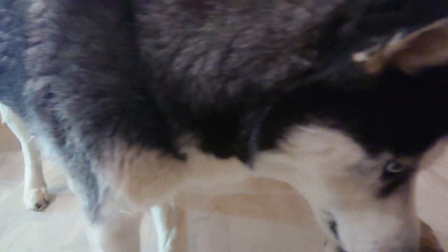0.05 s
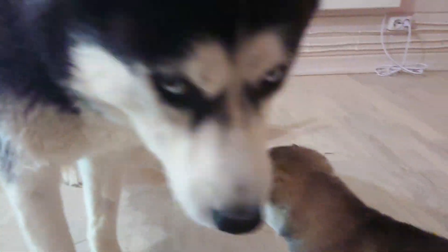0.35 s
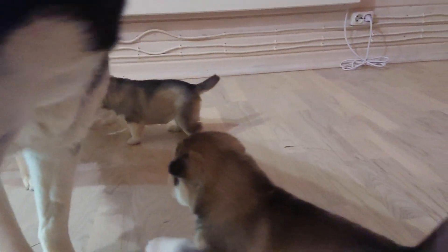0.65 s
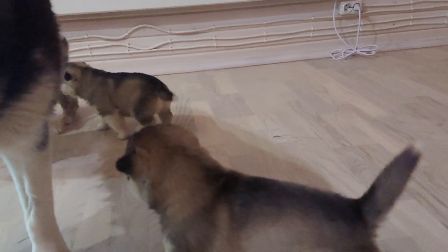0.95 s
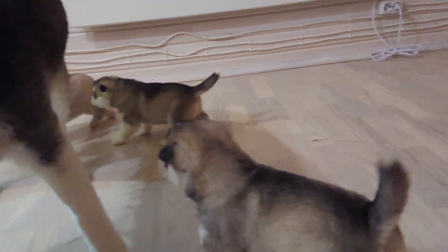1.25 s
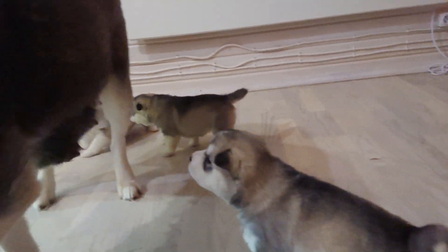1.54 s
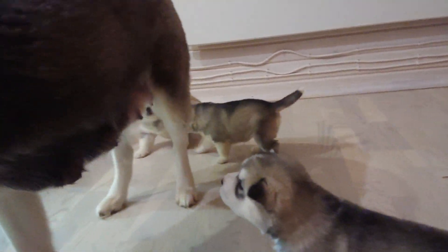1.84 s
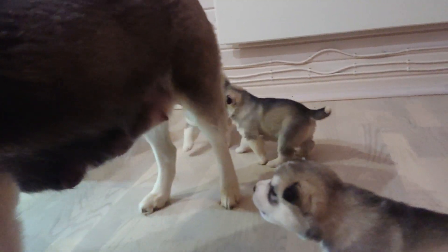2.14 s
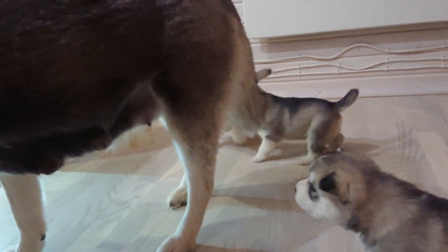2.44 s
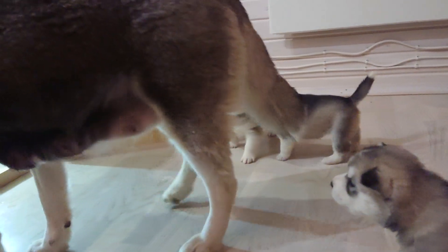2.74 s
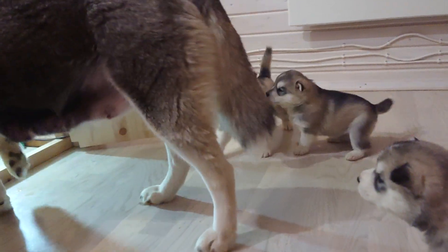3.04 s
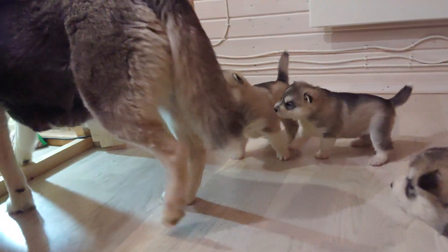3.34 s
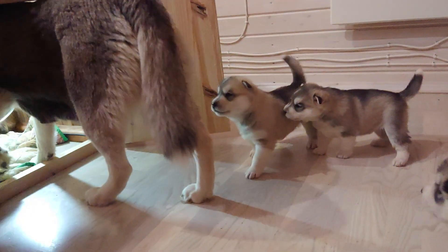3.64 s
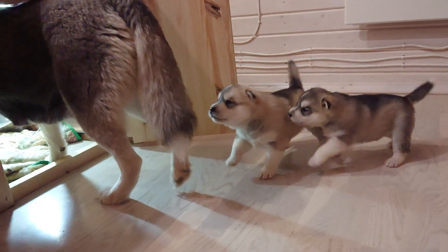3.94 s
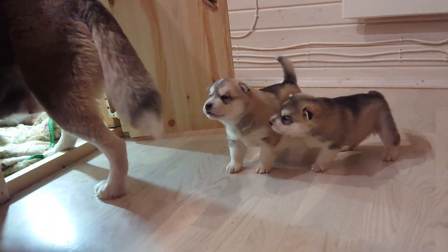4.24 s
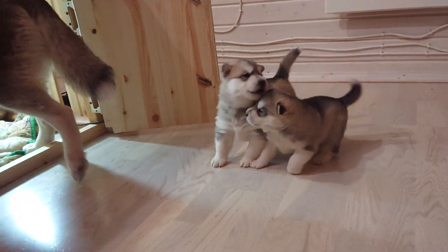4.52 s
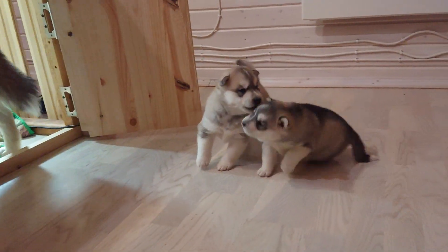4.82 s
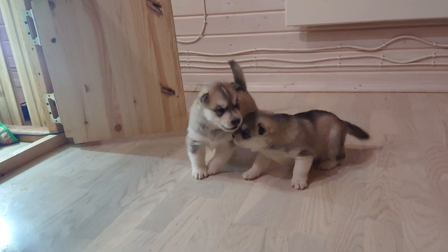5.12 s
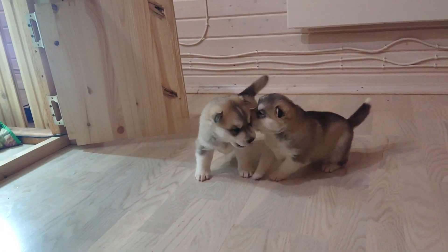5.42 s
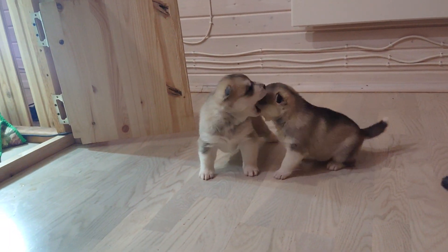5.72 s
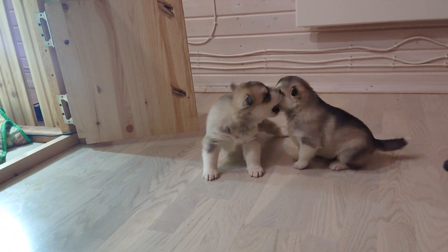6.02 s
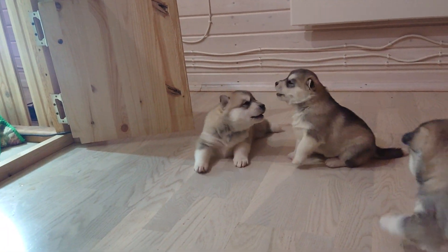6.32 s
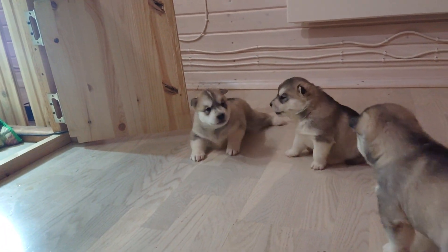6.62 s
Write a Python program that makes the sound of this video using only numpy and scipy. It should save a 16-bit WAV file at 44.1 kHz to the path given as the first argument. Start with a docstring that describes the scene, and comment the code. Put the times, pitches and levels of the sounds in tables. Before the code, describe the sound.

Two loud, high puppy yelps give way to soft, short squeaks, with paws padding and claws tapping on floorboards indoors.

```python
"""Paws skid, thud and click on a wooden floor, then a husky puppy yelps close by.
Small whimpers and hoarse grunts follow as the pups shuffle around their mother in a wood-panelled room.
Each cry is a high whistle of the vocal folds, shaped by a tiny throat and smeared by the bare walls.
Hard claws ring the boards and soft pads boom on them, over a faint hush and a thin hiss."""
import sys
import numpy as np
from scipy import signal
from scipy.fft import rfft, irfft, next_fast_len
from scipy.io import wavfile
from scipy.ndimage import uniform_filter1d, minimum_filter1d, map_coordinates

SR = 44100
rng = np.random.default_rng(int(sys.argv[2]) if len(sys.argv) > 2 else 0)


def to_wav(s):
    """Save 16-bit WAV."""
    ch = np.atleast_2d(s).T  # columns
    pcm = np.round(np.clip(ch, -1, 1) * 32767)  # PCM
    wavfile.write(sys.argv[1], SR, pcm.astype(np.int16))


N = 298557
TOP_HZ = 15900  # band limit

# paws sliding: start_s, length_s, level_db
SKID_CUES = [(0, 0.068, -49.5), (0.175, 0.032, -51.5), (1.494, .039, -56), (1.709, 0.1, -67),
             (1.962, .05, -60), (2.519, 0.063, -57.5), (3.017, 0.029, -57), (3.343, 0.0322, -60.5),
             (3.561, .13, -61.5), (3.948, .03, -55), (4.292, 0.12, -55), (6.073, 0.0694, -62),
             (6.53, .094, -59)]
# fur and pads rubbing on wood: frequency_hz, gain_db
SCUFF_EQ = [(240, -32.5), (400, -9.5), (636, -14.5), (730, -5.5), (1160, -16.5), (1380, -3), (2510, 1.5),
            (2840, -1.5), (3070, -2.5), (3580, -3), (5030, -3), (8900, -27), (10900, -13), (16000, -21)]
# how much the dogs stir: time_s, level_db
BUSTLE_CURVE = [(0.0, -63), (0.24, -68.5), (1.79, -64), (2.04, -72), (3.07, -70), (3.77, -76), (4.35, -64),
                (4.49, -70.5), (5.77, -75.5), (6.28, -71.5), (6.43, -71.5), (6.77, -69.5)]
# the floor under light steps: frequency_hz, gain_db
RUMBLE_EQ = [(21, -30), (35, -5.5), (65, 0.5), (146, -6.5), (225, -8.5), (444, -15), (559, -19), (900, -15),
             (1170, -45.5), (1980, -120)]
# the hush of the room: frequency_hz, gain_db
ROOM_TONE_EQ = [(21, -27), (35, -9.5), (88, 2), (443, -13), (778, 1), (1060, -8.5), (1300, -1.5),
                (1640, -14), (2340, -8), (3020, -18.5), (5050, -22), (8010, -31), (9100, -44.5),
                (10600, -24), (16000, -29.5)]
# heavier paw falls and bumps: start_s, level_db, knock_db, pitch_hz
PAW_CUES = [(0.101, -56.5, -6, 140), (0.856, -50, -4, 125), (0.949, -50, -11, 141.7),
            (1.124, -44.5, -11, 132), (1.38, -51.5, 1, 144), (1.499, -46.5, -16.5, 124),
            (1.949, -54, -10.5, 78.7), (2.969, -46.5, -17, 73.4), (4.335, -45, -11.5, 216),
            (4.537, -49, -6, 131), (4.606, -41.5, -18.5, 108), (4.764, -44.5, -34, 74.2),
            (5.0, -39, -11.5, 189), (5.39, -53, -6.5, 140), (5.812, -51, -28.5, 64.7),
            (5.991, -51, -33.5, 90.5), (6.283, -39, -21.5, 114.5), (6.309, -43, -43, 82.4),
            (6.548, -44, -10, 189.2)]
# low thud of the hollow floor: frequency_hz, gain_db
THUD_EQ = [(30, -16), (60, 5.5), (90, 0), (140, -5), (195, -3), (260, -17), (500, -32), (1500, -60.5)]
# woody midrange knock: frequency_hz, gain_db
KNOCK_EQ = [(100, -28), (220, -15), (300, 4), (390, 4.5), (520, -8.5), (650, -4), (850, -6), (1400, -10),
            (3000, -33)]
# claw taps: start_s, level_db, treble_db
CLAW_CUES = [(0.176, -41.5, -21), (0.198, -39.5, -20), (0.4308, -44.5, -16), (0.8561, -48.5, -10),
             (1.3834, -45.5, -7.5), (1.516, -39.5, -40), (1.7957, -36.5, -29), (2.1893, -31.5, -42),
             (2.1986, -31.5, -32.5), (2.961, -46, -26), (3.031, -39, -27.5), (3.042, -42, -24),
             (3.5301, -47.5, -25), (4.346, -32.5, -28), (4.9998, -41, -12), (5.1643, -48.5, -24),
             (5.475, -55.5, -8.5), (6.541, -46, -25)]
# resonances of a tapped floorboard: centre_hz, width_hz, gain_db
BOARD_MODES = [(1970, 130, 3), (1970, 160, 0.5), (2326, 83, 4), (2830, 170, -2.5), (3570, 600, -11),
               (5000, 480, -9.5)]
# loud cries: climax_s, level_db, swell_db_per_s, overtones_db, roughness (0-1)
YELP_CUES = [(0.301, -16.5, 95, -11.5, 0.07), (.603, -14.5, 84.5, -4.5, 0.46),
             (.657, -31.5, -170, 6.5, .22), (1.069, -29.5, -61, -17.5, 0.45)]
# one pitch line per loud cry, the third a second tone breaking out of the big yelp: time_s, pitch_hz
YELP_CONTOURS = [
    [(.236, 1710), (.297, 2441), (.318, 2697), (.375, 2736)],
    [(.522, 1802), (.545, 1533), (.555, 1348), (.576, 1359), (.593, 1507), (.618, 1740), (.665, 1549)],
    [(.606, 2235), (.622, 2320), (.64, 2526), (.666, 2323)],
    [(1.012, 2173), (1.056, 2361), (1.072, 2051), (1.088, 2186)],
]
# open-mouth voice colour: frequency_hz, gain_db
THROAT_EQ = [(900, -5.5), (1500, -1.5), (2200, -3.5), (2750, -1.5), (3600, -4), (4300, 0), (5000, 0),
             (5800, 3.5), (7000, -19), (9000, -23.5), (16000, -20)]
# hoarse falling grunts: start_s, pitch_hz, level_db
GRUNT_CUES = [(1.377, 1676, -49.5), (1.925, 1312, -57), (2.147, 1072, -63), (2.365, 1169, -63),
              (4.621, 1298, -54.5), (5.386, 1446, -56), (5.688, 1600, -53.5), (6.058, 1707, -46)]
# closed-mouth voice colour: frequency_hz, gain_db
NOSE_EQ = [(700, 12), (1300, -0.5), (1700, -2.5), (2050, 0), (2400, -14.5), (3300, -10.5), (4100, -12),
           (4800, 3), (5600, -9.5), (7000, -13), (16000, -24)]
# small arching cries: start_s, rise_s, fall_s, top_hz, level_db, overtones_db, roughness (0-1)
WHIMPER_CUES = [ (1.57, .033, 0.0175, 1850, -50, -30, 0.37), (2.108, 0.0424, 0.02, 1347, -45, -17, 0.1),
                (2.344, 0.0354, 0.025, 1470, -49.5, -17, 0.13), (2.776, .045, 0.033, 1674, -39, -12, 0.35),
                (3.073, 0.016, 0.033, 1333, -52, -32, 0.5), (3.4, 0.021, 0.024, 1215, -64.5, -19, 0.1),
                (3.877, .046, .022, 2380, -36.5, -31.5, .24), (4.139, .035, .037, 2101, -28.5, -24, .11),
                (4.395, 0.0298, 0.023, 1376, -49.5, -21, 0.65),
                (4.802, 0.031, 0.028, 1429, -45.5, -18.5, 0.31),
                (5.025, 0.034, 0.0148, 1880, -38.5, -13, .03), (5.58, .05, 0.028, 1806, -39, -23, 0.05),
                (5.947, .066, 0.047, 2396, -47, -21, 0.29), (6.291, .058, .097, 2287, -37.5, -22, 0.05),
                (6.71, .038, 0.056, 1704, -46, -24, 0.16), ]
# reverb time of the panelled room: frequency_hz, t60_s
WALL_DECAY = [(100, 0.08), (800, 0.3), (2200, 0.33), (5000, 0.28), (12000, 0.041)]
# microphone colour, notched in the treble: frequency_hz, gain_db
MIC_EQ = [(6000, 1.5), (7800, -8.5), (9000, -13), (10500, 6.5), (16000, -1.5)]
# thin, airy hiss: frequency_hz, gain_db
HISS_EQ = [(2000, -52), (7000, -9), (9000, -16), (10500, -1), (13000, -4.5), (16000, -3.5)]


def amp(db):
    """Decibels to gain."""
    return 10 ** (np.asarray(db) / 20)


def unit(x):
    """Scale to rms 1."""
    return x / np.sqrt(np.mean(x ** 2) + 1e-20)


def along(points, hz):
    """Read a curve of (frequency_hz, value) points on a log frequency axis."""
    f, v = np.transpose(points)
    return np.interp(np.log(hz + 1), np.log(f + 1), v)


def wobble(rate, size):
    """A smooth random curve, rate knots a second."""
    knots = rng.standard_normal(int(size * rate / SR) + 4)
    return map_coordinates(knots, [np.arange(size) * rate / SR])


def filtered(x, response):
    """Pass x through a frequency response."""
    n = x.shape[-1]
    padded = next_fast_len(n + 8192)
    return irfft(rfft(x, padded) * response(np.fft.rfftfreq(padded, 1 / SR)), padded)[..., :n]


def noise(spectrum, size):
    """Coloured noise of rms 1."""
    return unit(filtered(rng.standard_normal(size), lambda hz: amp(along(spectrum, hz))))


def diffuse(spectrum, wide_hz=600):
    """A stereo noise bed: narrow in the bass, wide in the treble."""
    side = filtered(noise(spectrum, N), lambda hz: np.clip(hz / wide_hz, .25, 1))
    mid = noise(spectrum, N)
    return unit(np.array([mid + side, mid - side]))


def pan(x, pan_db):
    """Tilt the stereo balance; negative leans right."""
    return x * amp([[pan_db / 2], [-pan_db / 2]])


def add(track, start_s, sound):
    """Mix a stereo sound in at its cue."""
    i = max(round(start_s * SR), 0)
    track[:, i:i + sound.shape[1]] += sound[:, :max(N - i, 0)]


def in_room(x, wet_db, pan_db, alike, lag_s=.00011):
    """Direct sound, lag_s later on the right, plus a wall reverb that differs for every spot."""
    size = SR // 2
    hz, t, spectra = signal.stft(rng.standard_normal((2, size)), SR, nperseg=256)
    decay = amp(-60 * t / along(WALL_DECAY, hz)[:, None])
    tail = signal.istft(spectra * decay, SR, nperseg=256)[1][:, :size]
    tail *= 1 - np.exp(-(np.arange(size) / SR / .00092) ** 2)  # the first echoes build up
    tail[0] = alike * tail[1] + np.sqrt(1 - alike ** 2) * tail[0]  # more alike, narrower image
    sound = signal.fftconvolve(x[None], tail, axes=1)
    sound *= amp(wet_db) * np.linalg.norm(x) / np.linalg.norm(sound, axis=1, keepdims=True)
    sound[:, :len(x)] += filtered(x, lambda f: np.exp(-2j * np.pi * f * [[0], [lag_s]]))
    return pan(sound, pan_db)


def paw_skids(grain_db=4, grain_hz=298.8):
    """A paw skids over the boards in a run of tiny catches."""
    out = np.zeros((2, N))
    for start_s, length_s, db in SKID_CUES:
        n = int(length_s * SR)
        rub = unit(noise(SCUFF_EQ, n) * amp(grain_db * wobble(grain_hz, n)))
        rub *= amp(db) * signal.windows.tukey(n, .5)
        add(out, start_s, in_room(rub, wet_db=1, pan_db=-3, alike=.3))
    return out


def shuffling(scuff_db=3.5, rumble_db=1, grain_db=1, lump_db=5):
    """The more the dogs stir, the more fur and pads rub and the floor rumbles under light steps."""
    bustle_db = np.interp(np.arange(N) / SR, *np.transpose(BUSTLE_CURVE))
    scuff = diffuse(SCUFF_EQ) * amp(bustle_db + scuff_db + grain_db * wobble(76, N))
    rumble = diffuse(RUMBLE_EQ) * amp(bustle_db + rumble_db + lump_db * wobble(36, N))
    return pan(scuff, pan_db=-2) + rumble


def room_tone(level_db=-67):
    """A faint, steady hush under everything."""
    return amp(level_db) * diffuse(ROOM_TONE_EQ)


def paw_thuds(boom_t60_s=.13, thud_t60_s=.18, knock_t60_s=.29, attack_s=.0044):
    """Soft pads and tumbling bodies thud on the hollow floor; each spot booms at its own pitch."""
    out, t = np.zeros((2, N)), np.arange(SR // 3) / SR
    for start_s, db, knock_db, hz in PAW_CUES:
        boom = np.sin(2 * np.pi * hz * t) * amp(-60 * t / boom_t60_s)
        thud = noise(THUD_EQ, len(t)) * amp(-7 - 60 * t / thud_t60_s)
        knock = noise(KNOCK_EQ, len(t)) * amp(knock_db - 2 - 60 * t / knock_t60_s)
        step = (boom + thud) * (1 - np.exp(-t / attack_s)) + knock
        add(out, start_s, in_room(amp(db) * step, wet_db=-9.5, pan_db=0, alike=.75))
    return out


def board_response(f):
    """A floorboard's resonances, summed in alternating polarity."""
    return sum((-1) ** k * amp(db) * 1j * f * width / (centre ** 2 - f ** 2 + 1j * f * width)
               for k, (centre, width, db) in enumerate(BOARD_MODES))


def claw_taps(ring_db=-1, tick_db=4, snap_db=17, ring_t60_s=.024, snap_t60_s=.002, scratch_t60_s=.032):
    """A hard claw tip gives a snap, a brief scratch and a short ring of the board."""
    out, t = np.zeros((2, N)), np.arange(SR // 12) / SR
    snap = amp(snap_db - 60 * t / snap_t60_s)
    scratch = amp(-60 * t / scratch_t60_s)
    for start_s, db, treble_db in CLAW_CUES:
        ring = unit(filtered(rng.standard_normal(len(t)), board_response))
        ring *= amp(db + ring_db - 60 * t / ring_t60_s)
        tick = noise([(800, -22), (3000, -1), (5000, 12), (8000, -9.5), (15000, -1.5)], len(t))
        tick *= amp(db + treble_db + tick_db) * (snap + scratch)
        add(out, start_s, in_room(ring, wet_db=3, pan_db=-4, alike=.32))
        add(out, start_s, in_room(tick, wet_db=-7, pan_db=-4, alike=.22))
    return out


def voice(pitch, db, overtones_db, rough, tract, jitter, slope_db, rasp_db=-6, growl_db=-13, air_db=-30):
    """Vocal folds sing through the tract; roughness adds jitter, breath and period doubling."""
    def tract_gain(k):
        return amp(along(tract, k * hz)) * (k * hz < TOP_HZ)

    n = len(pitch)
    hz = pitch * (1 + jitter * rough * wobble(900, n) + .008 * wobble(160, n))
    phase = 2 * np.pi * np.cumsum(hz) / SR
    overtones = sum(amp(slope_db * (k - 2.5)) * tract_gain(k)
                    * np.sin(k * phase + rng.uniform(0, 2 * np.pi)) for k in range(2, 6))
    # period doubling puts a growl halfway between the harmonics
    growl = sum(amp(slope_db * (k - 4.5)) * tract_gain(k + .5) * np.sin((k + .5) * phase)
                for k in range(1, 5))
    puffs = noise(tract, n) * (1 + np.cos(phase))  # air rushes through the folds once a cycle
    air = filtered(puffs, lambda f: 1 - 1 / (1 + (f / 1400) ** 8))
    harsh = rough * (amp(rasp_db) * air + amp(growl_db) * growl * wobble(200, n))
    fundamental = tract_gain(1) * np.sin(phase)
    tone = fundamental + amp(overtones_db) * (overtones + harsh) + amp(air_db) * rough * air
    shimmer_db = 3 * rough * wobble(200, n)
    return amp(db + shimmer_db) * tone * signal.windows.tukey(n, min(SR / 125 / n, 1))


def yelps(gain_db=-1, onset_s=.018, shut_db=-28, opening_s=.011, slump_db=-25.5, slump_s=.035,
          calm_share=.55, low_cut_hz=1345):
    """The nearest puppy cries out: each cry is roughest at its climax and then slumps."""
    out = np.zeros((2, N))
    for contour, (climax_s, db, swell_db_per_s, overtones_db, rough) in zip(YELP_CONTOURS, YELP_CUES):
        times, hz = np.transpose(contour)
        t = np.arange(times[0], times[-1], 1 / SR)
        age = t - times[0]
        nearness = np.exp(-np.abs(t - climax_s) / slump_s)
        push_db = np.where(t < climax_s, swell_db_per_s * (t - climax_s), slump_db * (1 - nearness))
        mouth_db = shut_db * np.exp(-age / opening_s)  # the opening mouth lets the overtones out
        strain = rough * (calm_share + (1 - calm_share) * nearness)
        cry = voice(np.interp(t, times, hz), db + gain_db + push_db, overtones_db + mouth_db, strain,
                    THROAT_EQ, jitter=.08, slope_db=-5, rasp_db=-5)
        cry *= np.minimum(age / onset_s, 1) ** 1.1
        # a tiny mouth radiates no bass
        cry = filtered(cry, lambda f: 1 - 1 / (1 + (f / low_cut_hz) ** 12))
        add(out, times[0], in_room(cry, wet_db=1, pan_db=-7, alike=.2))
    return out


def grunts(gain_db=1, length_s=.036, sag_octaves=.52, fade_db=-8):
    """The folds go slack: a short hoarse sound that sinks and fades."""
    out = np.zeros((2, N))
    spent = np.linspace(0, 1, int(length_s * SR)) ** 1.2
    for start_s, hz, db in GRUNT_CUES:
        pitch = hz * 2 ** (-sag_octaves * spent)
        cry = voice(pitch, db + gain_db + fade_db * spent, overtones_db=-12, rough=.81,
                    tract=NOSE_EQ, jitter=.078, slope_db=-4.5)
        add(out, start_s, in_room(cry, wet_db=1, pan_db=-3, alike=.12, lag_s=.0001))
    return out


def whimpers(gain_db=1, rest_hz=1140.5, start_lift=.45, end_lift=.58, creep_db=-5.5, slack_db=-7,
             tire_db=-2):
    """Pitch and loudness arch together with the push of each small cry, which tires towards its end."""
    out = np.zeros((2, N))
    for start_s, rise_s, fall_s, top_hz, db, overtones_db, rough in WHIMPER_CUES:
        t = np.arange(0, rise_s + fall_s, 1 / SR)
        from_top = np.interp(t, [0, rise_s, rise_s + fall_s], [-1, 0, 1])
        slack = np.abs(np.sin(np.pi / 2 * from_top)) ** 2.3
        lift = 1 - slack * (1 - np.where(t < rise_s, start_lift, end_lift))
        pitch = rest_hz + lift * (top_hz - rest_hz)
        onset_db = creep_db * np.exp(-t / (.32 * rise_s))
        push_db = onset_db + slack_db * slack + tire_db * (t / t[-1] - .5)
        cry = voice(pitch, db + gain_db + push_db, overtones_db, rough, NOSE_EQ,
                    jitter=.09, slope_db=-2.5)
        pan_db = -6 - 4.5 * np.log2(top_hz / 1744)  # higher whimpers lean further right
        add(out, start_s, in_room(cry, wet_db=1, pan_db=pan_db, alike=.073, lag_s=.0001))
    return out


def limiter(x, ceiling=.87):
    """Duck any peak above the ceiling for a few ms."""
    gain = np.minimum(1, ceiling / (np.abs(x).max(axis=0) + 1e-9))
    return x * uniform_filter1d(minimum_filter1d(gain, size=257), size=129)


def scene():
    """Cries and footfalls, coloured by the microphone, over skids, shuffling and room tone."""
    dogs = yelps() + whimpers() + grunts() + claw_taps() + paw_thuds()
    dogs = filtered(dogs, lambda hz: amp(along(MIC_EQ, hz)))
    return dogs + paw_skids() + shuffling() + room_tone()


def record(dry, hiss_db=-37, growth=.67, linger_s=.028):
    """A thin hiss swells and lingers with every loud sound; the mix is limited and cut above TOP_HZ."""
    hold = np.exp(-1 / (linger_s * SR))
    loudness = signal.lfilter([1 - hold], [1, -hold], np.abs(dry), axis=1)
    hiss = amp(hiss_db) * loudness ** growth * diffuse(HISS_EQ)
    return filtered(limiter(dry + hiss), lambda hz: hz < TOP_HZ)


dry = scene()
out = record(dry)
to_wav(out)
```